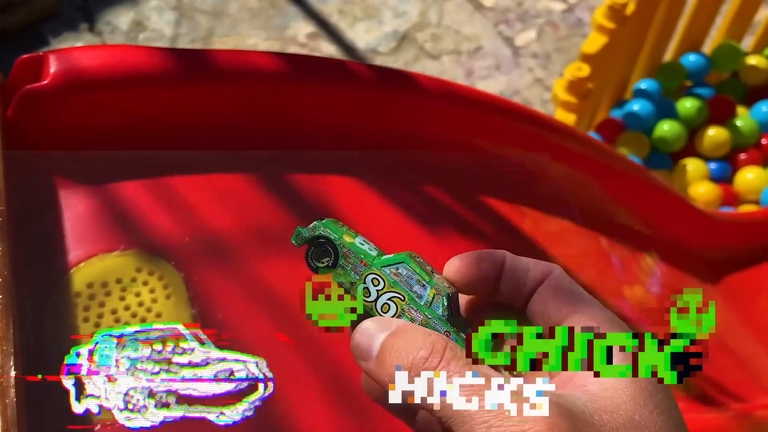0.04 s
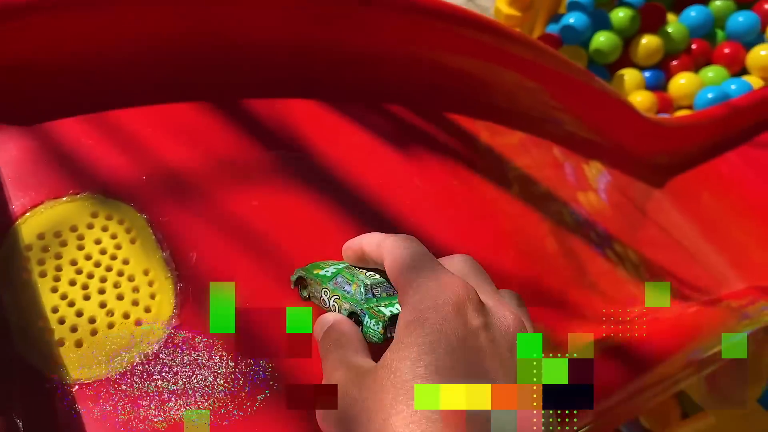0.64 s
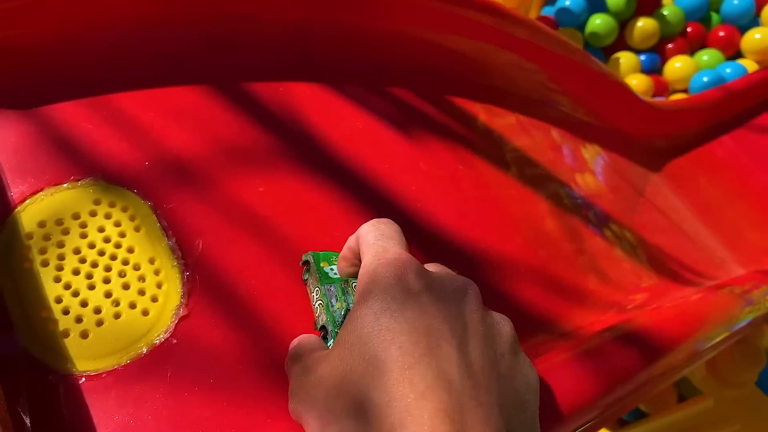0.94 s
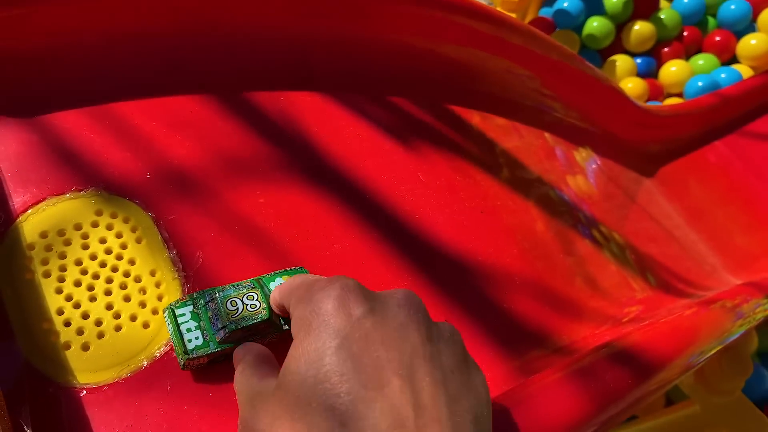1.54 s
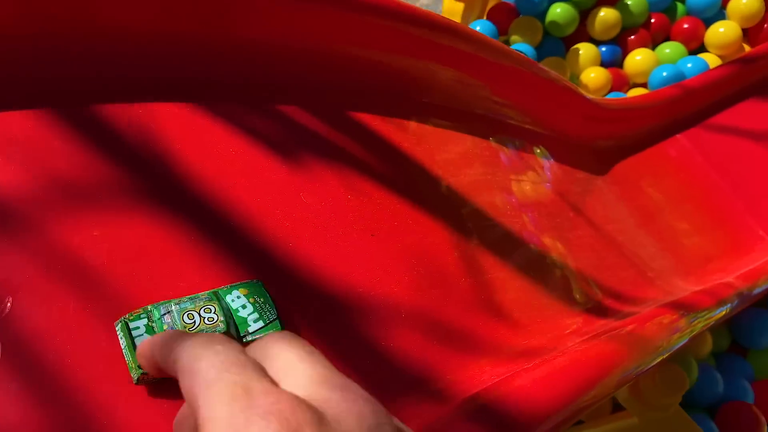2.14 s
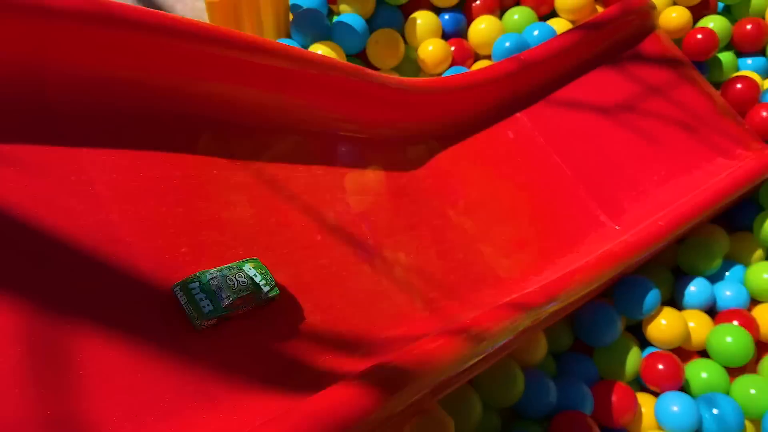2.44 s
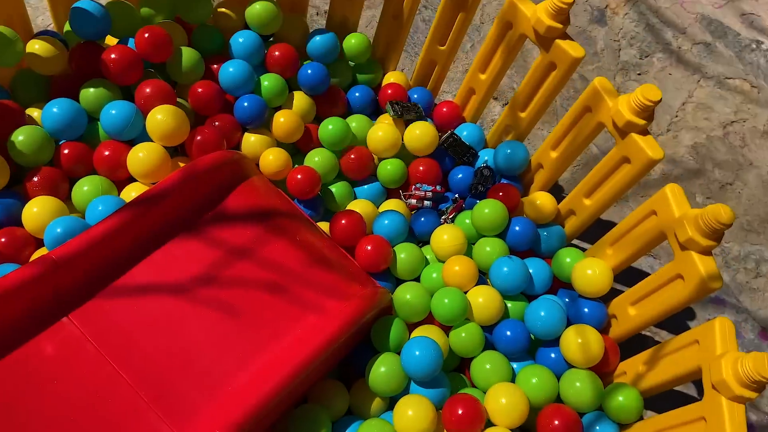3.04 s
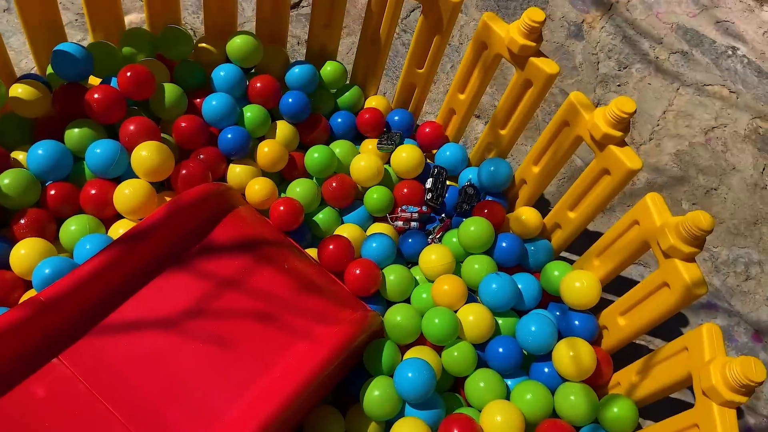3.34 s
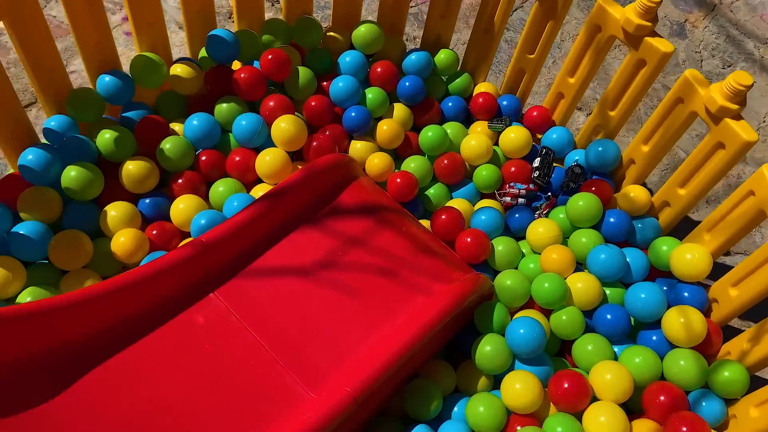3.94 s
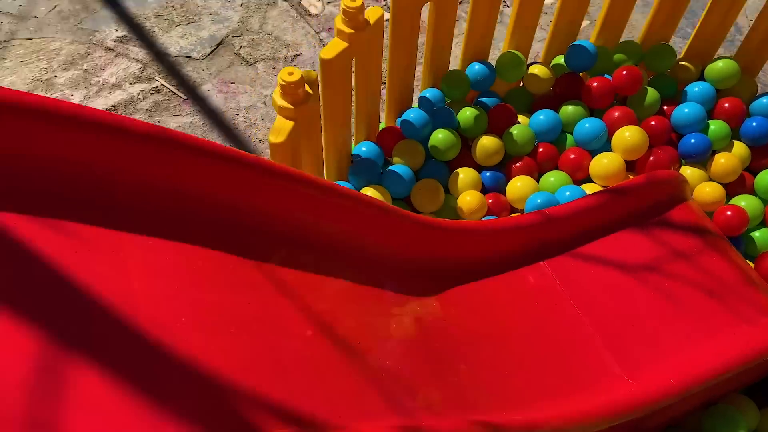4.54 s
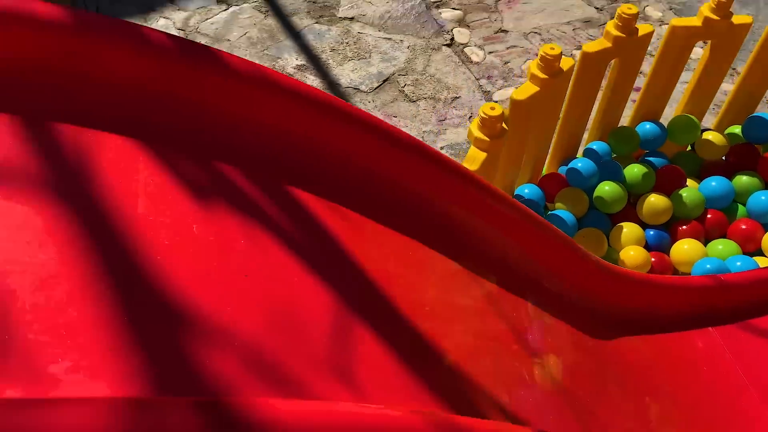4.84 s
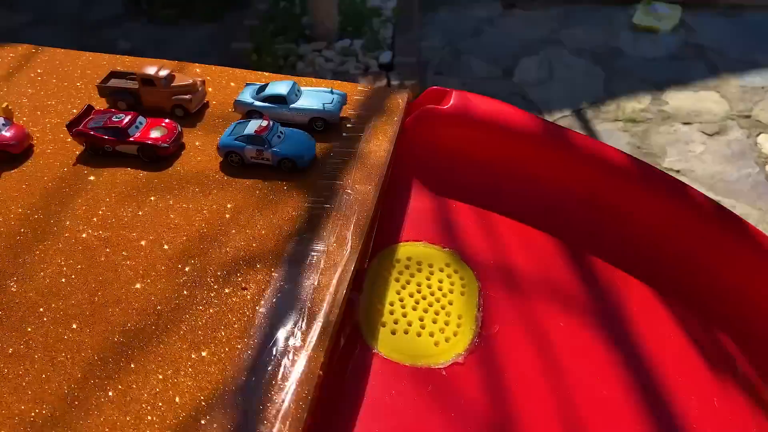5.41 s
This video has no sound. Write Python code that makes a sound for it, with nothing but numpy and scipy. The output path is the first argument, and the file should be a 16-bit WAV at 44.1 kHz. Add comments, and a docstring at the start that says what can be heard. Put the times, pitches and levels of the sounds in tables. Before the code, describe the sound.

A small metal toy car is set down on a hollow plastic slide with a knock, then dragged round with clicks and a brief scrape. Released, it gathers speed, wheels drumming and axles rattling, bangs over the lower end and drops among plastic balls that clack and jostle while its wheels run down. The microphone is close, outdoors, with a distant motor droning low throughout.

```python
"""Outdoors at a hollow plastic slide, stereo microphone close by; a distant motor drones throughout.
A small die-cast toy car is set down with a knock and dragged round on scraping wheels, then let go.
It gathers speed, its wheels drumming the chute and its loose axles rattling in the metal shell.
It bangs over the lower end and drops among the plastic balls of a ball pit, which clack and jostle
while its wheels run down. A faint rustle and one last light knock follow."""
import sys
import numpy as np
from scipy import signal
from scipy.fft import rfft, irfft
from scipy.io import wavfile

SR = 44100
rng = np.random.default_rng(int(sys.argv[2]) if len(sys.argv) > 2 else 0)


def output_pcm(signal):
    """Save a mono or channel-first signal as 16-bit PCM at the path in sys.argv[1].

    Samples are clipped to [-1, 1] before scaling.
    """
    pcm = np.clip(np.atleast_2d(signal).T, -1, 1) * 32767
    wavfile.write(sys.argv[1], SR, np.round(pcm).astype(np.int16))


N = 241182
TIME = np.arange(N) / SR
RELEASE_S, LIP_S, FLAT_S = 1.91, 2.5, 2.588   # the car is let go, meets the lip, stops gaining speed

# how alike close sound is at the microphone's two ports: (frequency [Hz], likeness [0-1])
CLOSE_LIKENESS = [(60, .94), (350, .92), (800, .68), (1400, .45), (2400, .62), (3700, .9), (4800, .45),
                  (6600, .85), (7500, .7), (8500, .99), (9600, .99), (10500, .75), (12000, .97),
                  (14000, .75), (15000, .98)]
# modes of the hollow slide: (frequency [Hz], relative level [dB], t60 [s])
SLIDE_MODES = [(110.5, -5.5, 0.079), (171, -3, 0.058), (230, -5.5, 0.099), (270, -3, 0.053),
               (289, -4.5, 0.1), (319, -4.5, 0.11), (414, -13, 0.089), (475, -2.5, 0.064),
               (535.6, -3.5, 0.073), (575, -8.5, 0.082), (625, 0, 0.06), (717, -5, 0.073), (774, -6.5, 0.1),
               (869, -1.5, 0.049), (903, 0, 0.022), (1015, -5, 0.067), (1126, -6.5, 0.063),
               (1230, -8.5, 0.028), (1400, -13.5, 0.04), (1606, -17.5, 0.023), (1757, -17, 0.04),
               (2065, -18, 0.055), (2323, -17.5, 0.13)]
# dense ringing of the slide's walls: (frequency [Hz], relative density [dB])
WALL_SPECTRUM = [(70, -4.5), (130, 4.5), (210, -7.5), (290, 11), (430, 1.5), (600, -7.5), (900, -6.5),
                 (1400, -2.5), (2200, -10), (3200, -14), (6000, -24.5)]
# modes of the die-cast shell and its axles: (frequency [Hz], relative level [dB], t60 [s])
CAR_MODES = [(1740, -3.5, 0.035), (2140, -9, 0.026), (3450, -8, 0.064), (3600, -5.5, 0.034),
             (3890, -13, 0.09), (4320, -11.5, 0.037), (5420, -9.5, 0.028), (5850, 1, 0.036),
             (5970, -9.5, 0.013), (6600, 3, 0.031), (7740, -10, 0.033), (7790, 2.5, 0.028),
             (8430, 0, 0.036), (10900, -13.5, .02), (13300, -13, .02), (14000, -12, .03)]
# crack of small metal parts: (frequency [Hz], relative density [dB])
METAL_SPECTRUM = [(700, -16), (1700, -3), (2700, -7), (3700, -1), (4700, -7), (5900, -1), (7400, -2),
                  (8600, 1.5), (9500, -1), (10500, -7), (12000, -9), (13600, -5), (14500, -11),
                  (15500, -14)]
# the car hits the slide, levels relative:
# (time [s], boom [dB], knock [dB], metal click [dB], struck spot's pitch [Hz], its ring [dB])
SLIDE_HITS = [(0.308, -66, -44, -65, 870, -54), (0.667, -19, -23, -24, 812, -14),
              (0.6686, -22.5, -23.5, -29, 2300, -24.5), (0.672, -23, -33, -44, 282.9, -14.5),
              (0.9895, -44.5, -36, -48, 857, -30.5), (1.0512, -29, -22.5, -7, 1764, -20.5),
              (1.0535, -21.5, -23, -18.5, 480, -13.5), (1.064, -40, -31, -27, 855, -31),
              (1.563, -58, -44, -34, 2120, -33.5), (2.1302, -29.5, -33.5, -24.5, 1120, -34.5),
              (2.137, -38, -46, -40, 1900, -32), (2.243, -28, -29, -29, 1760, -25),
              (2.288, -36, -22.5, -30, 810, -25), (2.3226, -44, -22, -21.5, 828, -23),
              (2.341, -26, -32, -20.5, 373, -19.5), (2.390, -30, -22.5, -22, 698, -24),
              (2.427, -45.5, -28, -22, 1400, -30), (2.448, -46, -31, -25.5, 1380, -32),
              (2.473, -48, -26.5, -20, 1362, -27.5), (2.489, -21.5, -24.5, -26, 353, -25),
              (2.537, -16, -25.5, -18.5, 310, -11.5), (2.566, -12.5, -26, -12.5, 269, -9),
              (2.597, -16, -20, -19, 275, -11.5), (2.6206, -19, -21.5, -14.5, 319, -15.5),
              (2.632, -15.5, -28, -24, 1300, -22.5), (2.649, -17, -20.5, -17.5, 390, -22.5),
              (2.668, -20, -24, -17.5, 246, -12.5), (2.6871, -10.5, -11, -19.5, 540, -6.5),
              (2.709, -19, -19.5, -41, 320, -14), (2.720, -20, -11.5, -21, 541, -7.5),
              (2.7594, -15, -12.5, -23.5, 1450, -14.5), (5.341, -64, -39.5, -50.5, 1065, -42)]
# the car tumbles among the balls, levels relative: (time [s], thump [dB], clack [dB])
BALL_HITS = [(2.882, -38, -26), (3.020, -30, -27), (3.035, -50, -30), (3.147, -24, -65),
             (3.186, -23.5, -32.5), (3.213, -32, -82), (3.236, -29, -38.5), (3.357, -32, -49)]


def from_db(db):
    """Decibels to gain."""
    return 10 ** (np.asarray(db) / 20)


def rms_one(x):
    """Scale to unit rms."""
    return x / np.sqrt(np.mean(x ** 2) + 1e-20)


def gain_curves(rows):
    """One gain curve for each dB column of a timed table."""
    times, *columns = np.transpose(rows)
    return [from_db(np.interp(TIME, times, db)) for db in columns]


def swells(rows):
    """Gain curve of smooth, bell-shaped strokes."""
    return sum(from_db(db) * np.exp(-((TIME - s) / half) ** 2) for s, half, db in rows)


def at_hz(points, hz):
    """Read a table on a log-frequency axis."""
    table_hz, value = np.transpose(points)
    return np.interp(np.log(np.maximum(hz, 1)), np.log(table_hz), value)


def drift(rate_hz):
    """Slow random wander with a spread of 1."""
    pole = np.exp(-80 * np.pi * rate_hz / SR)
    slow = signal.lfilter([1], [1, -2 * pole, pole * pole], rng.standard_normal(N // 40 + 2002))[2000:]
    return np.interp(np.arange(N) / 40, np.arange(len(slow)), rms_one(slow))


def noise(spectrum, likeness=CLOSE_LIKENESS):
    """Stereo noise of a given colour and left-right likeness, at unit rms."""
    hz = np.arange(N // 2 + 1) * SR / N
    alike = np.clip(at_hz(likeness, hz), 0, 1)
    mid, side = rfft(rng.standard_normal((2, N)))
    pair = np.sqrt(1 + alike) * mid + np.sqrt(1 - alike) * side * [[1], [-1]]
    return rms_one(irfft(pair * from_db(at_hz(spectrum, hz)) * (hz > 20), N))


def train(times, sizes):
    """Single clicks at the given times."""
    clicks = np.zeros(N)
    np.add.at(clicks, np.round(times * SR).astype(int), sizes)
    return clicks


def bumps(per_s, spread_db):
    """Tiny contacts of uneven size at random moments."""
    return (rng.random(N) < per_s / SR) * from_db(spread_db * np.minimum(rng.exponential(1, N), 3))


def ring(clicks, hz, t60):
    """Each click starts a decaying sine of its own height."""
    pole, step = from_db(-60 / (t60 * SR)), 2 * np.pi * hz / SR
    return signal.lfilter([0, np.sin(step)], [1, -2 * pole * np.cos(step), pole * pole], clicks + 1e-18)


def dying(clicks, t60):
    """Envelope of dense ringing: each click adds energy, which then leaks away."""
    return np.sqrt(signal.lfilter([1], [1, -from_db(-120 / (t60 * SR))], clicks ** 2 + 1e-18))


def strike(clicks, modes, uneven_db):
    """Every contact rings each mode with a strength of its own, a little different at each port."""
    at = np.flatnonzero(clicks)
    out = np.zeros((2, N))
    for k, (hz, db, t60) in enumerate(modes):
        alike = np.clip(at_hz(CLOSE_LIKENESS, hz), 0, 1)
        strength, lean = rng.standard_normal((len(at), 2)).T
        pan = np.sqrt(1 + alike) + np.sqrt(1 - alike) * np.sign(lean) * [[1], [-1]]
        force = np.zeros((2, N))
        force[:, at] = clicks[at] * from_db(db + uneven_db * strength) * pan
        out += (-1) ** k * ring(force, hz, t60) / np.sqrt(2)
    return out


def outdoor_air(hiss_db=-61.5):
    """Rumble, murmur, a far rush and thin hiss reach the microphone from all round."""
    # how alike diffuse sound is at the two ports: (frequency [Hz], likeness [0-1])
    diffuse = [(60, 1), (250, 0.72), (500, 0.3), (1000, 0), (2000, 0), (4000, 0.14), (8000, 0.97),
               (13000, 1)]
    # colours of the four layers: (frequency [Hz], relative density [dB])
    rumble_spectrum = [(25, -37), (45, -4), (80, -3), (130, -6), (220, -9.5), (500, -55)]
    murmur_spectrum = [(70, -5.5), (130, -7.5), (200, -3), (290, -1), (460, -4), (600, -10), (800, -13),
                       (1400, -24.5), (3000, -49)]
    rush_spectrum = [(500, -13), (1000, 3.5), (1500, -1), (1830, 7), (2200, 3.5), (2750, 0), (3600, -12.5),
                     (5500, -17.5), (9000, -54)]
    hiss_spectrum = [(1000, -1), (2700, 5), (3800, -0.5), (5500, -5.5), (6600, 0), (7800, 1.5),
                     (9000, -6.5), (10500, -22.5), (15500, -10.5)]
    # their slow rise and fall: (time [s], rumble [dB], murmur [dB], far rush [dB])
    air_levels = [(0, -44, -45.5, -50), (1.25, -38, -42.5, -49), (1.8, -47, -41.5, -47.5),
                  (2.6, -35.5, -39.5, -41), (3.2, -36, -39.5, -47), (3.7, -47.5, -42.5, -53.5),
                  (4.5, -52.5, -44, -57.5), (5.47, -48.5, -46, -57)]
    rumble_gain, murmur_gain, rush_gain = gain_curves(air_levels)
    rumble = rumble_gain * noise(rumble_spectrum, diffuse) * from_db(drift(1.9))
    murmur = murmur_gain * noise(murmur_spectrum, diffuse) * from_db(1.24 * drift(22.0))
    rush = rush_gain * noise(rush_spectrum, diffuse) * from_db(drift(7.3))
    return rumble + murmur + rush + from_db(hiss_db) * noise(hiss_spectrum, diffuse)


def hum():
    """A faint background hum whose tones waver in level and phase."""
    # its swell: (time [s], level [dB])
    hum_level = [(0, -50.5), (1.5, -47.5), (3.3, -46), (4.5, -43.5), (5.47, -52)]
    # its tones: (frequency [Hz], relative level [dB])
    hum_tones = [(124.5, -7), (264.5, -2), (343, -11.5), (387, -21)]
    tones = sum(from_db(db + 2.2 * drift(3)) * np.sin(2 * np.pi * hz * TIME + 1.1 * drift(3))
                for hz, db in hum_tones)
    return np.sqrt(2) * gain_curves(hum_level)[0] * tones


def distant_motor(left_lag_rad=0.25, flutter_db=-46, flutter_hz=6.6):
    """A far motor's deep drone swells and fades, with a slight flutter and faint wavering overtones."""
    # the fundamental: (time [s], pitch [Hz])
    motor_pitch = [(0, 58.35), (.3, 60.42), (2.0, 64.19), (3.8, 62.54), (5.47, 62.95)]
    # its swell: (time [s], level [dB])
    motor_level = [(0, -25), (.32, -26), (.56, -30), (.79, -24), (1.03, -30), (1.5, -23), (2.6, -24),
                   (2.86, -30), (3.3, -36), (3.65, -30), (3.9, -28.5), (4.1, -41.5), (4.26, -28),
                   (4.34, -47), (5.47, -41.5)]
    # its overtones: (multiple of the pitch, level [dB])
    overtones = [(2, -49.5), (3, -60)]
    hz = np.interp(TIME, *np.transpose(motor_pitch))
    phase = 2 * np.pi * np.cumsum(hz) / SR + left_lag_rad * np.array([[0], [1]])
    flutter = drift(flutter_hz) * np.sin(phase) + drift(flutter_hz) * np.cos(phase)
    drone = gain_curves(motor_level)[0] * np.sin(phase) + from_db(flutter_db) * flutter
    for multiple, db in overtones:
        drone += from_db(db + 1.2 * drift(2.8)) * np.sin(multiple * phase + 0.17 * drift(2.6))
    return np.sqrt(2) * drone


def rustle():
    """A faint, bright rustle close to the microphone."""
    # its strokes: (time [s], half length [s], level [dB])
    strokes = [(.98, 0.075, -56), (1.17, 0.11, -57), (4.05, .03, -63), (4.215, 0.043, -56.5)]
    return swells(strokes) * noise(METAL_SPECTRUM)


def wheel_scrape(catch_db=1.8):
    """As the car is dragged round, its wheels catch and slip sideways in tiny, uneven jerks."""
    # short pushes of the hand: (time [s], half length [s], level [dB])
    pushes = [(.995, 0.027, -42.5), (1.10, 0.051, -39), (1.182, 0.026, -37), (1.245, 0.042, -54),
              (1.297, 0.067, -35)]
    # what the slipping wheels ring with: (frequency [Hz], relative level [dB], t60 [s])
    scrape_modes = [(296, -5.5, 0.038), (543, -3.5, 0.013), (820, 3, 0.0085), (1145, 2.5, 0.013),
                    (1850, -5, 0.018), (2290, -7.5, 0.012), (3400, -5, 0.0036), (5800, -11.5, 0.0022),
                    (8400, -9.5, 0.0063)]
    slips = bumps(per_s=1800, spread_db=2.5) * rng.choice([-1, 1], N) * from_db(catch_db * drift(45))
    return swells(pushes) * rms_one(strike(slips, scrape_modes, uneven_db=2.5))


def speed(slowing_s=0.13):
    """The car's speed, 0-1: it rises evenly down the chute, then dies away on the flat end."""
    gained = np.clip((TIME - RELEASE_S) / (FLAT_S - RELEASE_S), 0, 1)
    return gained * np.exp(-np.maximum(TIME - FLAT_S, 0) / slowing_s)


def hop_dips(hop_s=0.014, dip_db=-5.5):
    """Gain of the rolling sounds: the wheels leave the plastic briefly before each landing."""
    landings = [s for s, *_ in SLIDE_HITS if RELEASE_S < s < LIP_S]
    airborne = sum(np.exp(-((TIME - s + hop_s / 2) / hop_s) ** 2) for s in landings)
    return from_db(dip_db * np.minimum(airborne, 1))


def after_clacks(relative_db, t60):
    """Envelope of the motion that each clack among the balls stirs up."""
    times, _, clack_db = np.transpose(BALL_HITS)
    return dying(train(times, from_db(clack_db + relative_db)), t60)


def wheel_chinks():
    """Loose wheels chink on their axles: when set down, at hard bumps and among the balls."""
    # the chinks: (time [s], level [dB], t60 [s])
    chinks = [(.673, -42, .015), (.677, -44, .015), (.681, -40, .015), (.6865, -36, .015),
              (.693, -41, 0.023), (.707, -42, .025), (2.302, -27, 0.054), (2.488, -20.5, 0.046),
              (2.668, -29, .04), (2.687, -30, 0.028), (3.033, -28.5, .06), (3.09, -42, .04),
              (3.114, -42, .06), (3.18, -33.5, .05), (3.239, -34, 0.085), (3.30, -48, .03),
              (3.35, -46, .05), (3.36, -44, .06), (3.376, -45.5, 0.079), (3.405, -49, .06),
              (3.458, -53, .06)]
    # their thin colour: (frequency [Hz], relative density [dB])
    chink_spectrum = [(3000, -21), (7000, -7.5), (9500, -10), (11500, -9), (14000, -6), (15500, -15)]
    energy = sum(dying(train(s, from_db(db)), t60) ** 2 for s, db, t60 in chinks)
    return noise(chink_spectrum) * np.sqrt(energy)


def metal_crack(clicks, t60, tail_db):
    """Small metal parts give a bright crack, then a weaker shiver."""
    return noise(METAL_SPECTRUM) * (dying(clicks, t60) + from_db(tail_db) * dying(clicks, t60=0.14))


def axle_ticks(jolt_db=-26.5, shell_db=-14):
    """The axles knock against their slots: in the fingers, then harder as the car gathers speed."""
    # single ticks: (time [s], relative level [dB])
    ticks = [(0.156, -46), (0.162, -47), (0.239, -44.5), (0.264, -50), (0.629, -51), (0.804, -45),
             (0.845, -48), (1.008, -39.5), (1.194, -41), (1.349, -46), (1.485, -50.5), (1.871, -42),
             (1.914, -47.5), (1.934, -39), (1.953, -36.5), (1.987, -37), (2.028, -31), (2.186, -35),
             (2.22, -29), (2.301, -22), (2.376, -25), (2.519, -24), (2.608, -15.5)]
    times, db = np.transpose(ticks)
    jolts = from_db(jolt_db) * speed() * bumps(per_s=33, spread_db=0.5) * (TIME < LIP_S)
    clicks = train(times, from_db(db)) + jolts
    crack = metal_crack(clicks, t60=0.01, tail_db=-15.5)
    return crack + from_db(shell_db) * strike(clicks, CAR_MODES, uneven_db=2.0)


def wheel_whirr(top_speed_db=-32, free_db=-38, loss_db_per_s=21.5, waver=0.011, respin_sizzle_db=-7):
    """The wheels ring and sizzle on their axles, run down after the slope and are jolted by the balls."""
    # wheel resonances: (frequency [Hz], relative level [dB], t60 [s])
    wheel_modes = [(1720, -0.5, .025), (2028, 2.5, 0.049), (2254, 1, 0.044), (2750, 4.5, .012),
                   (3430, -3, .025), (3850, -3.5, .025), (4290, 0, 0.021), (5490, -4.5, 0.027),
                   (5930, -6, .022), (6580, -4, 0.031), (13150, -3, .025)]
    # colour of the high sizzle: (frequency [Hz], relative density [dB])
    sizzle_spectrum = [(4000, -28), (7000, -3.5), (9300, -11), (10800, -3.5), (11300, -6), (11900, -1),
                       (12300, -5), (13200, -2), (14000, 4.5), (14600, -20), (15600, -25)]
    # its rise and fall: (time [s], level [dB])
    sizzle_level = [(1.88, -100), (1.95, -63), (2.1, -49), (2.2, -40), (2.28, -34.5), (2.42, -35),
                    (2.5, -31.5), (2.66, -46), (2.76, -44), (2.95, -48), (3.04, -42), (3.16, -53.5),
                    (3.5, -62.5), (3.9, -100)]
    rubs = bumps(per_s=700, spread_db=3.5) * rng.choice([-1, 1], N)
    samples = np.arange(N)
    wavering = samples + waver * np.cumsum(drift(7.05))   # the resonances swing a little in pitch
    steady = strike(rubs, wheel_modes, uneven_db=5.5)
    rings = rms_one(np.array([np.interp(wavering, samples, side) for side in steady]))
    sizzle = rms_one(dying(rubs, t60=0.046)) * noise(sizzle_spectrum)
    free_spin = (TIME > FLAT_S) * from_db(free_db - loss_db_per_s * np.maximum(TIME - FLAT_S, 0))
    spin = np.hypot(from_db(top_speed_db) * speed(), free_spin)
    respin = after_clacks(relative_db=-12, t60=0.32)
    sizzle_gain = np.hypot(gain_curves(sizzle_level)[0], from_db(respin_sizzle_db) * respin)
    return sizzle_gain * sizzle + np.hypot(spin, respin) * rings


def rolling_gains(drum_db=-20.5, rattle_db=-24.5, skip_s=2.35, onset_s=0.0065, skip_db=-7.5):
    """Drumming and rattle grow with speed and thin as the car skips; later the balls jostle both."""
    contact = from_db(skip_db * (1 + np.tanh((TIME - skip_s) / onset_s)) / 2)
    drum = from_db(drum_db) * speed() ** 0.88 * contact
    rattle = from_db(rattle_db) * speed() ** 1.82 * contact
    jostle = after_clacks(relative_db=-6.5, t60=0.18)
    return np.hypot(drum, jostle), np.hypot(rattle, from_db(-12) * jostle)


def rolling():
    """Hard wheels cross the plastic's grain: each bump drums the chute; axles chatter in the shell."""
    drum_gain, rattle_gain = rolling_gains()
    grain = bumps(per_s=520, spread_db=3.0) * rng.choice([-1, 1], N)
    chute = 0.85 * rms_one(strike(grain, SLIDE_MODES, uneven_db=2.0))
    wall = 0.71 * noise(WALL_SPECTRUM) * rms_one(dying(grain, t60=0.022))
    chatter = bumps(per_s=190, spread_db=6.0)
    shell = 0.95 * rms_one(strike(chatter * rng.choice([-1, 1], N), CAR_MODES, uneven_db=1.0))
    axles = 0.62 * noise(METAL_SPECTRUM) * rms_one(dying(chatter, t60=0.034))
    return drum_gain * (chute + wall) + rattle_gain * (shell + axles)


def slide_boom(times, boom_db, knock_db, spot_hz, mode_db=-3.5, near_db=6.5, near_octaves=0.097):
    """Blows ring the hollow slide's modes, favouring those near the struck spot's pitch."""
    out = np.zeros((2, N))
    for k, (hz, db, t60) in enumerate(SLIDE_MODES):
        stiff = np.clip(np.log2(hz / 330) / 1.2, 0, 1)   # low modes boom, higher ones knock
        near = np.exp(-(np.log2(hz / spot_hz) / near_octaves) ** 2)
        blow_db = (1 - stiff) * boom_db + stiff * knock_db + near_db * near
        size = from_db(mode_db + db + blow_db + rng.normal(0, 0.48, len(times)))
        arrival = times + rng.uniform(0, 0.001616, len(times))   # bending waves take a moment to spread
        lean = np.clip(hz / 1200, 0, .8) * rng.uniform(-1, 1, len(times))
        force = np.array([train(arrival, size * (1 + lean)), train(arrival, size * (1 - lean))])
        out += (-1) ** k * ring(force, hz, t60)
    return out


def struck_spot(s, db, hz, t60):
    """A patch of plastic rings at its pitch, with little sound below it, and leans to one port if high."""
    lean = np.clip(0.52 * hz / 1000, 0, .9) * rng.choice([-1, 1])
    low_cut = signal.butter(2, 0.45 * hz, "high", fs=SR)
    tone = signal.lfilter(*low_cut, ring(train(s, from_db(db)), hz, t60))
    return tone * np.array([[1 + lean], [1 - lean]])


def knocks(ball_hz=245, wall_db=-4.0, shell_db=-13.5, crack_db=-3.5, grip_db=-19, grip_t60_share=0.6):
    """Each blow on the slide or among the balls rings the plastic and clicks in the metal car."""
    ball_blows = [(s, thump, clack, clack - 1, ball_hz, thump) for s, thump, clack in BALL_HITS]
    times, boom_db, knock_db, click_db, spot_hz, spot_db = np.transpose(list(SLIDE_HITS) + ball_blows)
    held = times < RELEASE_S   # fingers damp the ringing and quieten the loose parts
    boom = slide_boom(times, boom_db, knock_db, spot_hz)
    spot_t60 = 0.073 * (500 / spot_hz) ** 0.51 * np.where(held, grip_t60_share, 1)
    spots = sum(struck_spot(*blow) for blow in zip(times, spot_db, spot_hz, spot_t60))
    wall = noise(WALL_SPECTRUM) * dying(train(times, from_db(knock_db + wall_db)), t60=0.077)
    damped_modes = [(hz, db, t60 * grip_t60_share) for hz, db, t60 in CAR_MODES]
    click = from_db(click_db + shell_db)
    free_shell = strike(train(times, click * ~held), CAR_MODES, uneven_db=3.0)
    held_shell = strike(train(times, click * held), damped_modes, uneven_db=2.0)
    jolts = train(times, from_db(click_db + crack_db + grip_db * held))
    return boom + spots + wall + free_shell + held_shell + metal_crack(jolts, t60=0.021, tail_db=-6.5)


def scene():
    """The car close to the microphone, with the open air and the motor far behind it."""
    wheels = hop_dips() * (rolling() + wheel_whirr())
    car = wheels + wheel_scrape() + knocks() + axle_ticks() + wheel_chinks()
    return car + rustle() + outdoor_air() + hum() + distant_motor()


def record(dry, ceiling=0.9, stopband_hz=16600):
    """The microphone's two ports differ in colour and phase; peaks are rounded and the top is cut."""
    # colour between the ports: (frequency [Hz], left minus right [dB])
    port_balance = [(60, -1.9), (280, .3), (600, -1), (1350, -4.6), (2300, -2), (3800, -.3), (5600, -6),
                    (6900, 1), (8500, 0)]
    # the treble arrives out of step: (frequency [Hz], left's lead [rad])
    port_phase = [(100, 0), (6000, -.2), (7200, .6), (7700, 1.9), (8500, 3.05), (9900, 3.3), (11200, 5.9),
                  (12900, 6.4), (14500, 9.3)]
    hz = np.arange(N // 2 + 1) * SR / N
    tilt = from_db(at_hz(port_balance, hz) / 2)
    ports = irfft(rfft(dry) * [tilt, np.exp(-1j * at_hz(port_phase, hz)) / tilt], N)
    rounded = ports / (1 + (ports / ceiling) ** 6) ** (1 / 6)
    return signal.sosfilt(signal.cheby2(14, 70, stopband_hz, fs=SR, output="sos"), rounded)


dry = scene()
out = record(dry)
output_pcm(out)
```